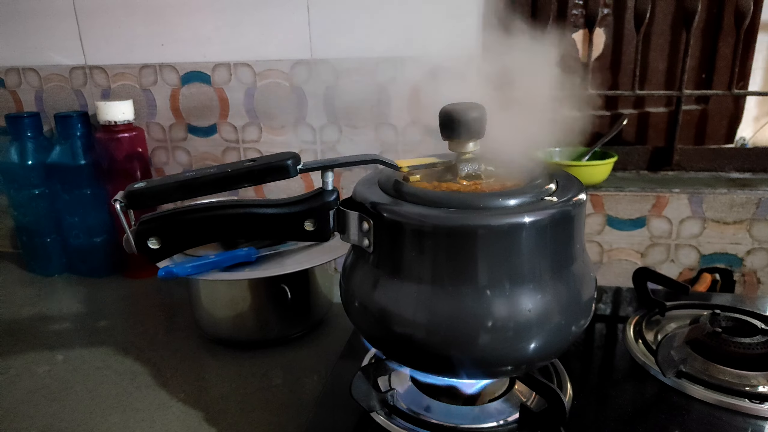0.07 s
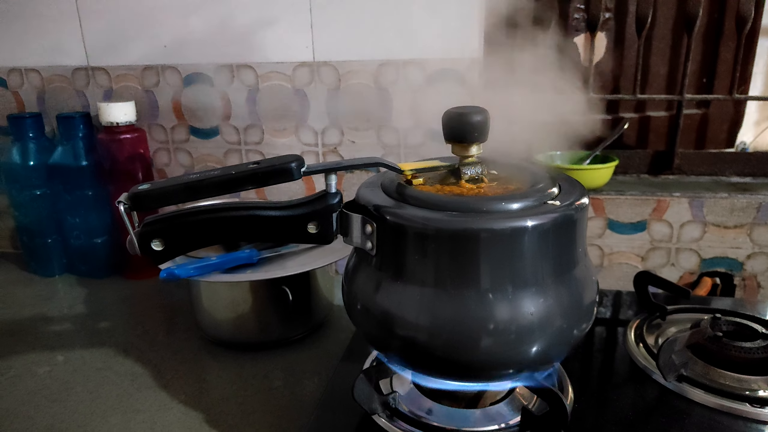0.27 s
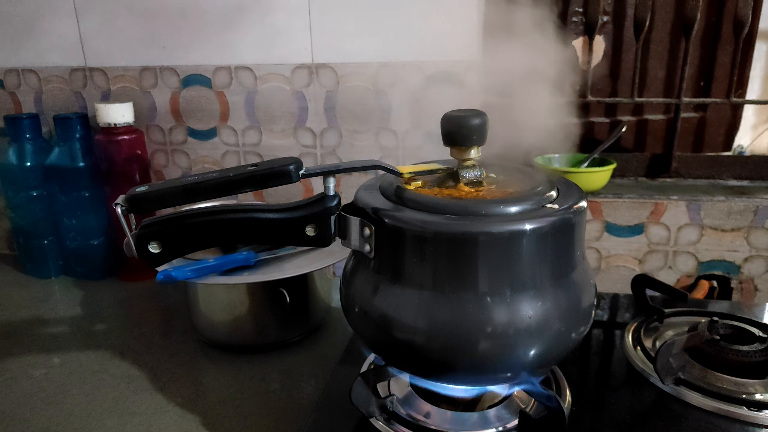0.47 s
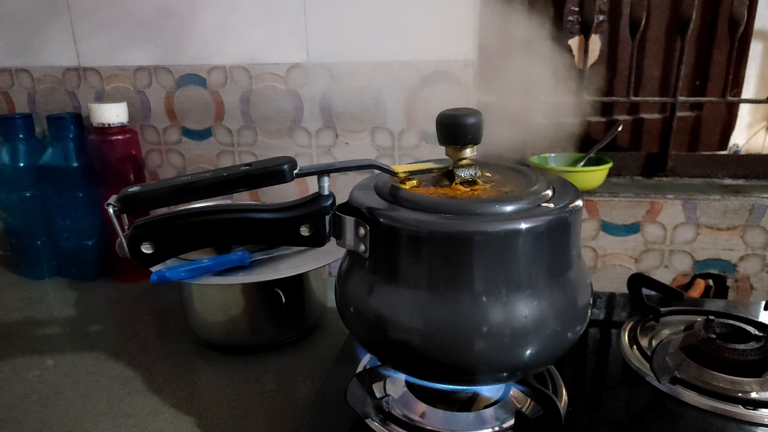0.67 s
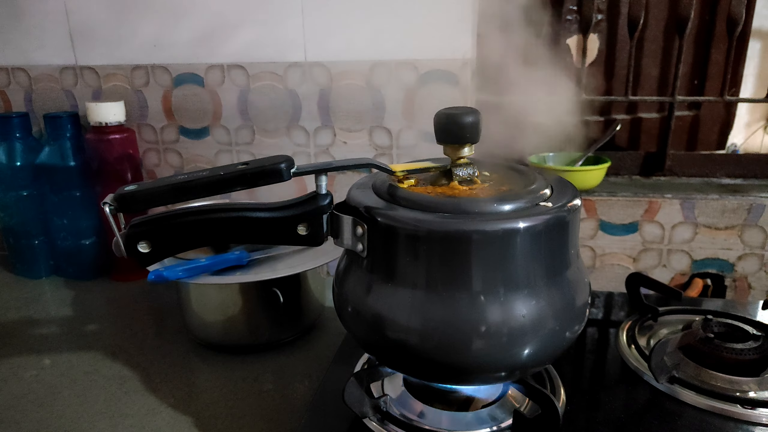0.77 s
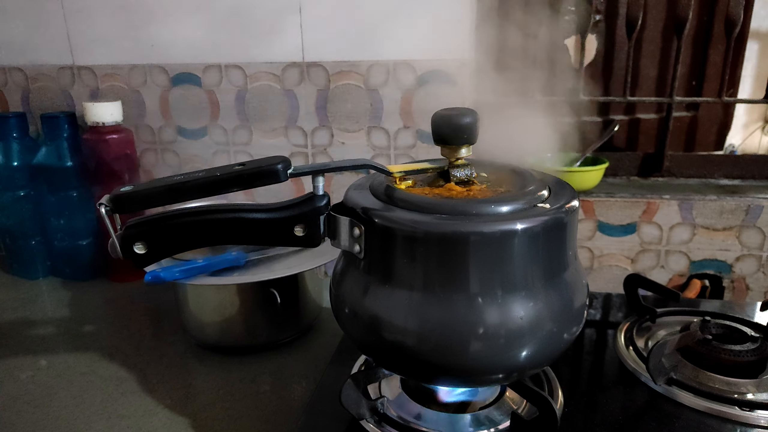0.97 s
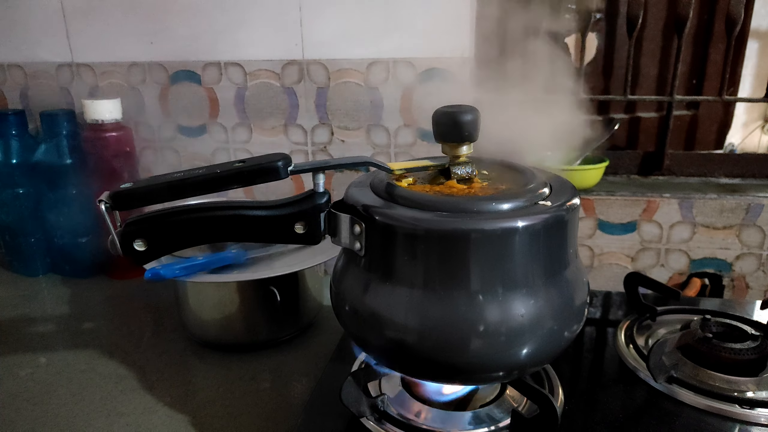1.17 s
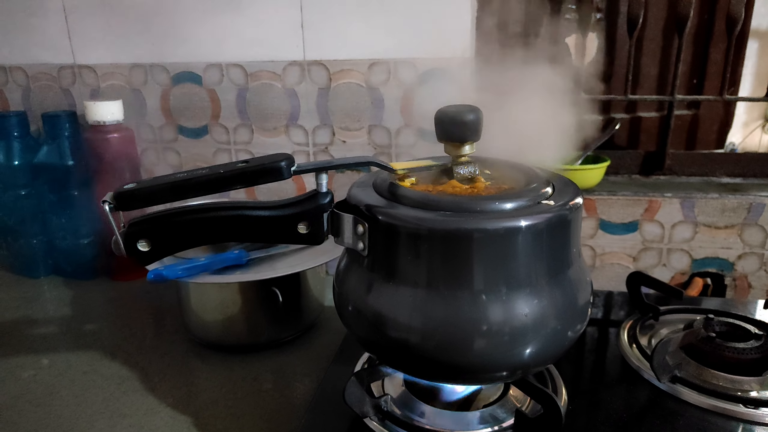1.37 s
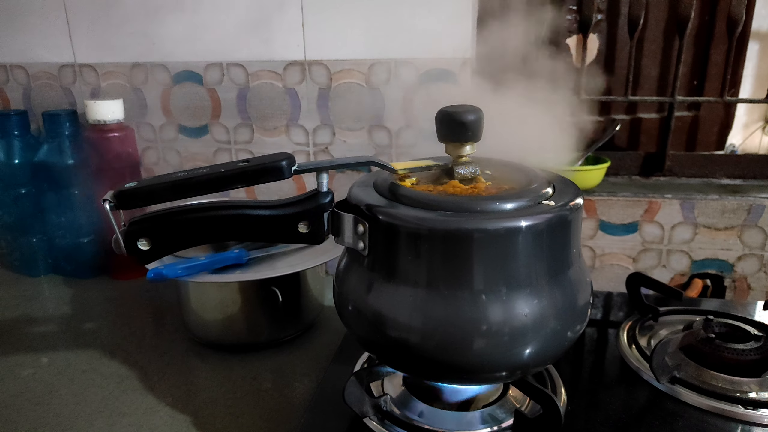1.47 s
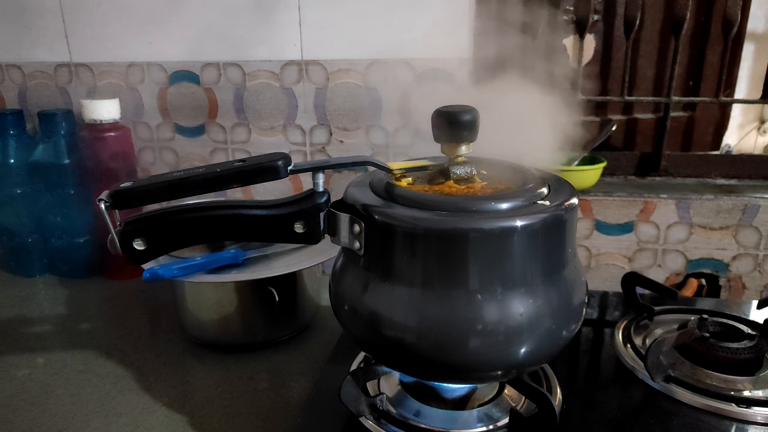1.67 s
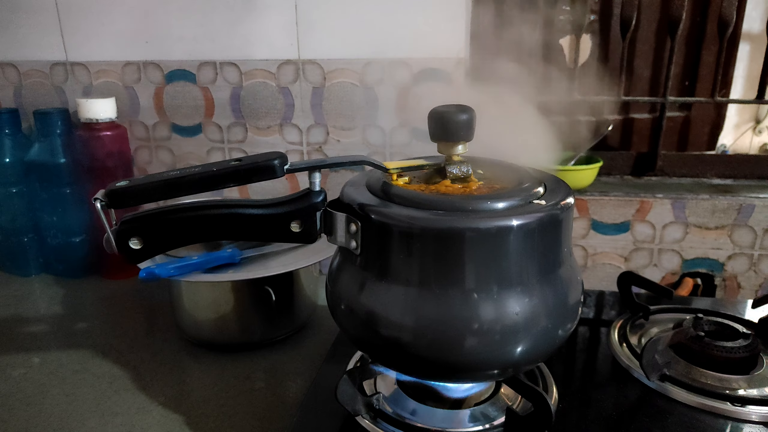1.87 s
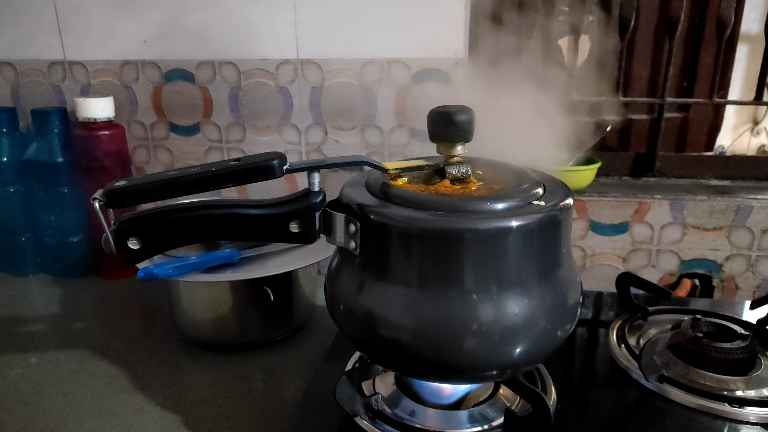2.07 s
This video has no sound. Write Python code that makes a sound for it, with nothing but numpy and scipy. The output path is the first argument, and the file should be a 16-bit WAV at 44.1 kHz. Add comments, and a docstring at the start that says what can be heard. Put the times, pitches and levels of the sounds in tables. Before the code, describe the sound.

A pressure cooker vents steam in a loud, sharp, unbroken hiss, already at full force and never stopping; soft uneven air thuds and a faint gas flame lie underneath, heard close on a phone in a tiled kitchen.

```python
"""Small tiled kitchen: steam jets from under the weight valve of a pressure cooker, near a hand-held phone.
Steam: flickering noise from six gaps, with tile echoes. Left port rings near 6.7 kHz and is overdriven
lopsidedly; right port hears a flatter hiss that settles.
Uneven puffs of air buffet the left port: shaped noise as thud, rumble and top hiss.
Gas flame: low flickering noise, in both ports, stronger in the right."""
import sys
import numpy as np
from scipy import signal
from scipy.fft import rfft, irfft
from scipy.io import wavfile
from scipy.ndimage import uniform_filter1d, minimum_filter1d

SR = 44100
rng = np.random.default_rng(int(sys.argv[2]) if len(sys.argv) > 2 else 0)


def gain_from_db(level_db):
    """Turn a decibel level (scalar or array-like) into a linear amplitude factor."""
    decades = np.asarray(level_db, float) / 20
    return 10 ** decades


def wrap_up_sound(samples):
    """Save the sound to the file named by the first command line argument, as 16-bit audio."""
    columns = np.atleast_2d(samples).T
    # keep every value between -1 and 1, then stretch to whole-number steps
    tamed = np.clip(columns, -1, 1)
    steps = np.round(tamed * 32767).astype(np.int16)
    wavfile.write(sys.argv[1], SR, steps)


N = 93183

# flame roar, before port gains: t/s, level/dB
FLAME_LEVEL = [(0.0, -43), (0.13, -54), (0.2, -38.5), (0.23, -46), (0.33, -39), (0.39, -50), (0.46, -45.5),
               (0.73, -52.5), (0.87, -40), (1.0, -56), (1.02, -48), (1.8, -50.5), (1.82, -50.5),
               (2.11, -52.5)]
# flame spectrum, relative: f/Hz, density/dB per Hz
FLAME_COLOUR = [(20, 1), (45, -16), (65, -6), (95, -11.5), (128, -1.5), (165, -10.5), (230, -17),
                (500, -28)]
# left-port buffeting, before gains: t/s, rumble/dB, top hiss/dB, thud/dB
BUFFET_LEVEL = [(0.0, -38.5, -32, -51), (0.03, -44, -31, -42.5), (0.1, -41, -34, -49),
                (0.13, -56, -41, -61), (0.15, -46, -40, -58), (0.28, -49, -38, -57),
                (0.32, -35.5, -34, -41), (0.4, -43.5, -35, -42), (0.42, -41.5, -34, -48),
                (0.5, -43.5, -35, -44), (0.53, -38.5, -34, -57), (0.58, -49, -36, -46),
                (0.61, -37, -35, -35.5), (0.63, -32.5, -29.5, -33), (0.68, -52, -40, -46),
                (0.8, -49, -38, -51.5), (0.85, -37, -38, -43.5), (0.92, -39.5, -30, -42),
                (0.99, -48, -39, -46), (1.06, -49, -40, -60), (1.12, -43, -36, -43), (1.23, -48, -37, -57),
                (1.27, -41, -39, -47), (1.32, -46.5, -34, -41.5), (1.42, -40.5, -32, -56),
                (1.44, -43, -35.5, -46.5), (1.75, -47.5, -39, -48.5), (1.85, -46, -33, -48.5),
                (1.87, -51, -37, -48), (1.96, -45, -36, -40.5), (2.06, -50, -38, -62),
                (2.11, -50, -37, -42)]
# thud and rumble spectrum, relative: f/Hz, density/dB per Hz
RUMBLE_COLOUR = [(15, 3), (30, -2), (60, -8), (120, -10), (250, -15), (600, -17.5), (1200, -21),
                 (2200, -21), (4000, -57)]
# puff hiss spectrum, relative: f/Hz, density/dB per Hz
TOP_HISS_COLOUR = [(9000, -30), (10500, -12), (11500, 4), (13000, 8), (15500, 8), (17000, -14)]
# left-port steam, before gains: t/s, ringing band/dB, band below/dB
LEFT_STEAM_LEVEL = [(0.02, -16, -24.5), (0.04, -18, -34), (0.05, -19.5, -24.5), (0.08, -17.5, -26),
                    (0.29, -16.5, -25.5), (0.45, -17.5, -26.5), (0.69, -19, -28.5), (0.73, -22, -31.5),
                    (0.83, -20.5, -28), (0.86, -17, -27.5), (0.99, -20, -27.5), (1.4, -18, -29.5),
                    (1.5, -20, -28), (1.58, -18.5, -28), (1.72, -21.5, -28.5), (1.8, -19.5, -28.5),
                    (1.85, -20.5, -31.5), (1.86, -19.5, -28), (1.95, -19.5, -31.5), (1.96, -20, -28.5),
                    (2.1, -19.5, -28.5), (2.11, -22, -26)]
# jet through left port, relative: f/Hz, density/dB per Hz
LEFT_PORT_COLOUR = [(1000, -71), (1600, -68), (2300, -61.5), (3000, -53.5), (3700, -53), (4400, -52),
                    (5100, -58.5), (5700, -53.5), (6200, -46), (6700, -44.5), (7300, -48), (7900, -52),
                    (8500, -62.5), (8900, -70.5), (9050, -70), (10100, -82), (11000, -74.5), (12000, -73),
                    (15500, -81)]
# jet through right port, relative: f/Hz, density/dB per Hz
RIGHT_PORT_COLOUR = [(250, -80.5), (500, -79.0), (1000, -74.5), (1700, -71), (2300, -59), (3000, -57),
                     (3600, -59), (4200, -63.5), (5000, -61), (6000, -64), (6500, -84), (7100, -73),
                     (8100, -64.5), (9300, -66.9), (10500, -72.5), (11300, -69), (12300, -64.5),
                     (13800, -65.5), (15500, -71.5)]
# narrow ripples on the left port's response: f/Hz, width/Hz, height/dB
LEFT_RIPPLES = [(3000, 78, -4.5), (3380, 210, 1.5), (3570, 160, 3), (4000, 140, 4), (6122, 61, 4.5),
                (6370, 25, 1), (6400, 52, 1.5), (6770, 49, 3.5), (6950, 35, 3.5), (7300, 47, 3),
                (7090, 41, -1.5), (7370, 38, 3), (7385, 21, -3), (7900, 100, -0.5), (7930, 60, -3.5)]
# left port's lead over right, from spacing and port resonances: f/Hz, phase/rad
LEFT_LEAD = [(0, 0.5), (1550, 0.85), (1980, 0.5), (3530, 4), (4130, 3.5), (4820, 2.5), (5340, 5), (6120, 5),
             (8180, 3.4), (9820, 7), (11000, 5.5), (12100, 12.5), (13200, 15), (16500, 9.5)]

FLAME_LEFT_DB, FLAME_RIGHT_DB, FLAME_FLICKER_DB, FLAME_FLICKER_HZ = 0.5, 3, -1.5, 8
THUD_SPLIT_HZ, THUD_GAIN_DB, RUMBLE_GAIN_DB, TOP_HISS_GAIN_DB = 99, 6.5, 6.5, 5
RUMBLE_FLICKER_DB, RUMBLE_FLICKER_HZ = 1.57, 39.95
JET_FLICKER_DB, JET_FLICKER_HZ = 1.49, 9.03
GAP_COUNT, GAP_SWAY_DB, GAP_SWAY_HZ, GAP_DELAY_SPREAD_S = 6, 2.5, 4.03, 0.00002
ROOM_T60_S, ROOM_DB, ROOM_TILT_DB_PER_OCTAVE = 0.25, 0.1, 1
STEAM_SPLIT_HZ, LEFT_RING_GAIN_DB, LEFT_BELOW_GAIN_DB = 5100, 6.5, 8
RIGHT_LOW_DB, RIGHT_TOP_DB = -24.5, -27.5  # settled levels
SETTLE_LOW_DB, SETTLE_TOP_DB, SETTLE_S = 5, 3.5, 0.49
LOPSIDED_DB, LOPSIDED_LOW_HZ, LOPSIDED_TOP_HZ = -20.5, 25, 1090
LIMIT_CEILING, LIMIT_S, TOP_CUT_HZ = 0.88, 0.002, 15740


def curve(table, column=1):
    """Straight lines between the rows of one column."""
    table = np.array(table)
    return np.interp(np.arange(N) / SR, table[:, 0], table[:, column])


def colour(x, table, extra_db=0):
    """Filter x by a spectrum table, 12 dB/octave rolloff below its first row; rms 1."""
    hz, db = np.array(table).T
    f = np.fft.rfftfreq(N, 1 / SR) + 1
    gain_db = np.interp(np.log(f), np.log(hz), db) + extra_db
    gain_db = gain_db - 12 * np.maximum(np.log2(hz[0] / f), 0)
    y = irfft(rfft(x) * gain_from_db(gain_db), N)
    return y / np.std(y)


def walk(rate_hz):
    """Random levels held 1 / rate s and slewed twice; spread 1."""
    hold = int(SR / rate_hz)
    steps = np.repeat(rng.standard_normal(N // hold + 1), hold)
    slewed = uniform_filter1d(uniform_filter1d(steps, hold), hold)[:N]
    return slewed / np.std(slewed)


def halves(x, split_hz):
    """Parts below and above a frequency, each rms 1."""
    spectrum = rfft(x)
    is_low = np.fft.rfftfreq(N, 1 / SR) <= split_hz
    low, high = irfft(spectrum * is_low, N), irfft(spectrum * ~is_low, N)
    return low / np.std(low), high / np.std(high)


def flame():
    """Gas flame: low flickering roar shared by both ports."""
    level_db = curve(FLAME_LEVEL) + FLAME_FLICKER_DB * walk(FLAME_FLICKER_HZ)
    roar = colour(rng.standard_normal(N), FLAME_COLOUR) * gain_from_db(level_db)
    return np.array([roar * gain_from_db(FLAME_LEFT_DB), roar * gain_from_db(FLAME_RIGHT_DB)])


def buffeting():
    """Puffs on the left port: thud and rumble below, a swell of hiss on top."""
    thud, rumble = halves(colour(rng.standard_normal(N), RUMBLE_COLOUR), THUD_SPLIT_HZ)
    flicker_db = RUMBLE_FLICKER_DB * walk(RUMBLE_FLICKER_HZ)
    rumble = rumble * gain_from_db(curve(BUFFET_LEVEL) + RUMBLE_GAIN_DB + flicker_db)
    thud = thud * gain_from_db(curve(BUFFET_LEVEL, column=3) + THUD_GAIN_DB)
    top_hiss = colour(rng.standard_normal(N), TOP_HISS_COLOUR)
    top_hiss = top_hiss * gain_from_db(curve(BUFFET_LEVEL, column=2) + TOP_HISS_GAIN_DB)
    return np.array([rumble + thud + top_hiss, np.zeros(N)])


def jet():
    """Turbulent noise in overlapping octave bands, each flickering on its own."""
    spectrum = rfft(rng.standard_normal(N))
    f = np.fft.rfftfreq(N, 1 / SR) + 1
    half_octave = 2 * np.log2(f / 100)
    total = np.zeros(N)
    for centre in range(0, 18, 2):
        band = irfft(spectrum * np.clip(1 - abs(half_octave - centre) / 2, 0, 1), N)
        total += band * gain_from_db(JET_FLICKER_DB * walk(JET_FLICKER_HZ))
    return total


def kitchen(x):
    """Direct sound with a phase lead at the left, plus a different tail of tile echoes for each port."""
    t = np.arange(SR // 2) / SR
    tails = rng.standard_normal((2, len(t))) * gain_from_db(-60 * t / ROOM_T60_S) * (t > 0.003)
    tails *= gain_from_db(ROOM_DB) / np.sqrt((tails ** 2).sum(axis=1, keepdims=True))
    f = np.fft.rfftfreq(N, 1 / SR)
    tilt = gain_from_db(ROOM_TILT_DB_PER_OCTAVE * np.log2((f + 300) / 6000))
    gap_delay_s = GAP_DELAY_SPREAD_S * rng.standard_normal()
    lead_rad = np.interp(f, *np.array(LEFT_LEAD).T) + 2 * np.pi * f * gap_delay_s
    direct = np.exp(-1j * np.outer([0, 1], lead_rad))
    return irfft(rfft(x) * (direct + rfft(tails, N) * tilt), N)


def share_pressure(x):
    """Even out the 0.1 s rms: the pressure behind all gaps is shared."""
    return x / np.sqrt(uniform_filter1d(x ** 2, SR // 10))


def steam():
    """Gaps round the weight, each with its own swell and path, as each port colours them."""
    left, right = sum(kitchen(jet() * gain_from_db(GAP_SWAY_DB * walk(GAP_SWAY_HZ))) for _ in range(GAP_COUNT))
    f = np.fft.rfftfreq(N, 1 / SR)
    ripple_db = sum(db / (1 + (2 * (f - hz) / width) ** 2) for hz, width, db in LEFT_RIPPLES)
    below, ring = halves(colour(share_pressure(left), LEFT_PORT_COLOUR, ripple_db), STEAM_SPLIT_HZ)
    ring = ring * gain_from_db(curve(LEFT_STEAM_LEVEL) + LEFT_RING_GAIN_DB)
    below = below * gain_from_db(curve(LEFT_STEAM_LEVEL, column=2) + LEFT_BELOW_GAIN_DB)
    low, top = halves(colour(share_pressure(right), RIGHT_PORT_COLOUR), STEAM_SPLIT_HZ)
    fade = np.exp(-(np.arange(N) / SR / SETTLE_S) ** 2.1)
    low = low * gain_from_db(RIGHT_LOW_DB + SETTLE_LOW_DB * fade)
    top = top * gain_from_db(RIGHT_TOP_DB + SETTLE_TOP_DB * fade)
    return np.array([ring + below, low + top])


def scene():
    """Flame, puffs and steam."""
    return flame() + buffeting() + steam()


def low_pass(x):
    """Removes everything above the highest recorded frequency."""
    return signal.sosfilt(signal.butter(12, 16850, fs=SR, output="sos"), x)


def record(dry):
    """Left port's lopsided (square-law) distortion leaks the envelope into the bass; limiter, top cut."""
    square = dry[0] ** 2 - np.mean(dry[0] ** 2)
    band = signal.butter(2, [LOPSIDED_LOW_HZ, LOPSIDED_TOP_HZ], "band", fs=SR, output="sos")
    leak = gain_from_db(LOPSIDED_DB) * signal.sosfilt(band, square)
    mix = dry + np.array([leak, np.zeros(N)])
    window = int(LIMIT_S * SR)
    gain = minimum_filter1d(LIMIT_CEILING / np.maximum(abs(mix), LIMIT_CEILING), window)
    mix = mix * uniform_filter1d(gain, window)
    top_cut = signal.ellip(14, 0.2, 75, TOP_CUT_HZ, fs=SR, output="sos")
    mix = signal.sosfilt(top_cut, mix)
    return low_pass(mix)


dry = scene()
out = record(dry)
wrap_up_sound(out)
```